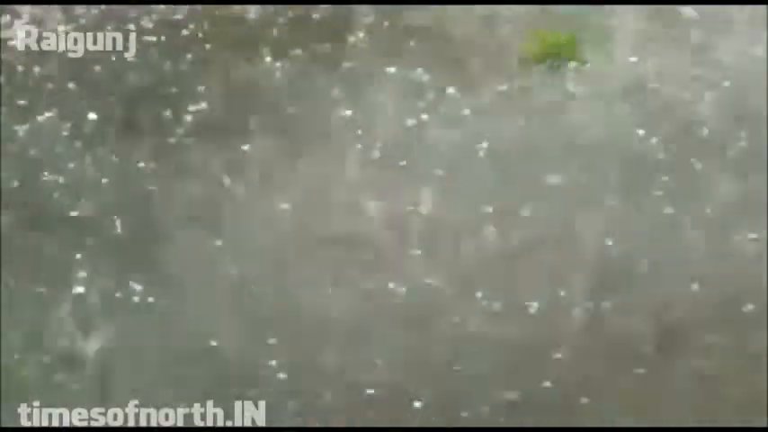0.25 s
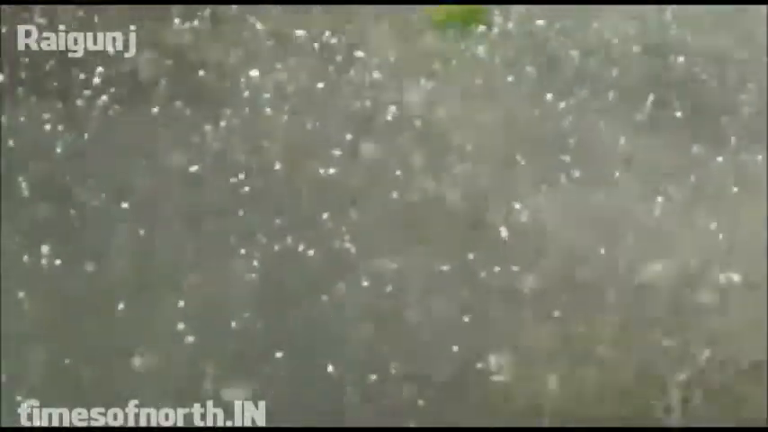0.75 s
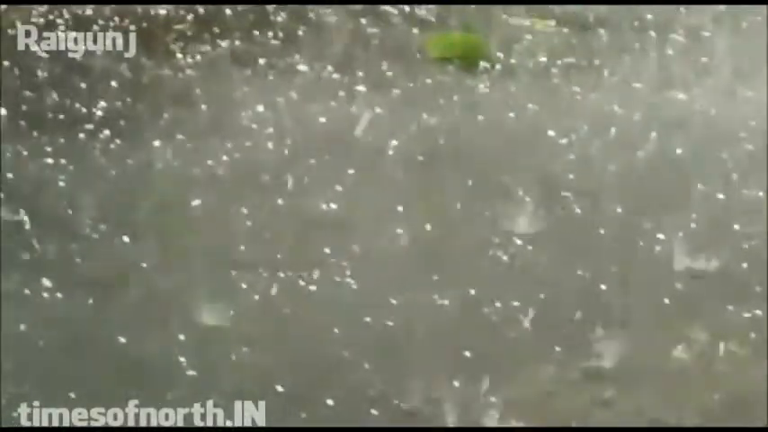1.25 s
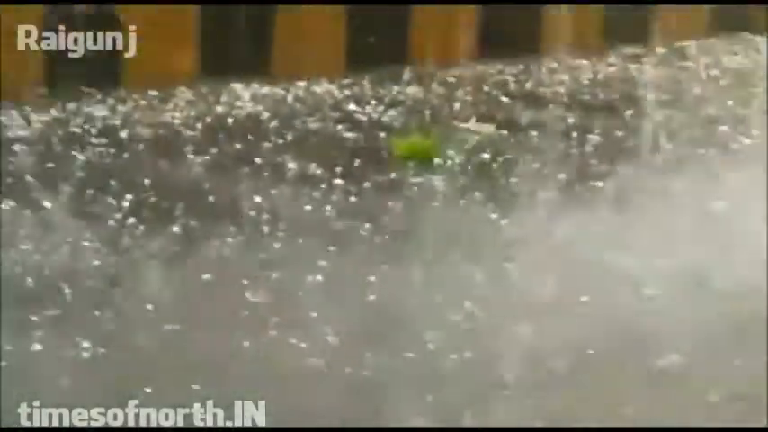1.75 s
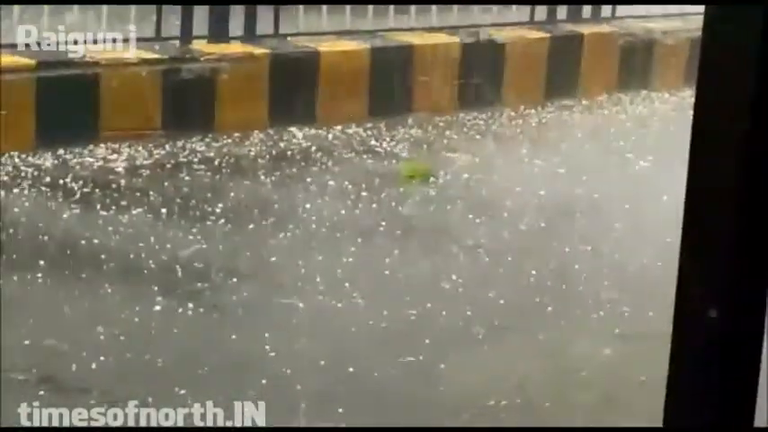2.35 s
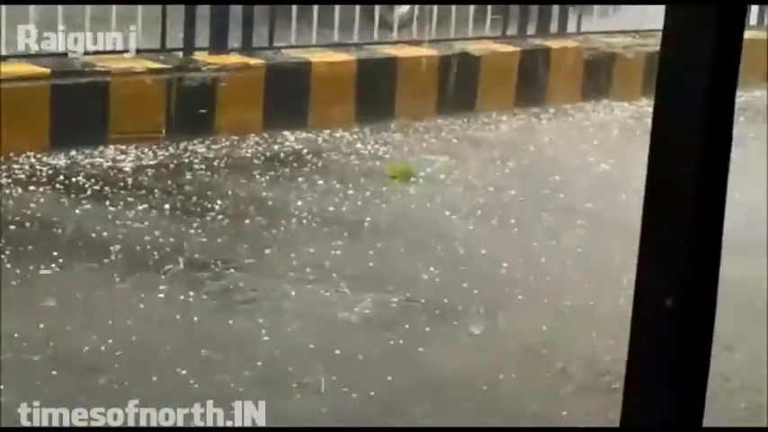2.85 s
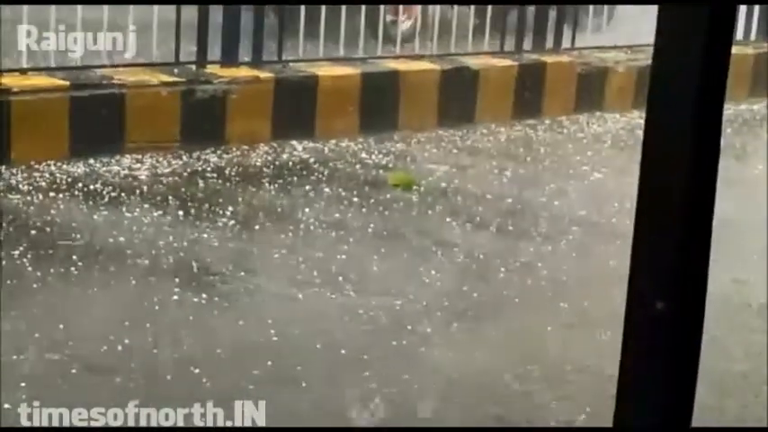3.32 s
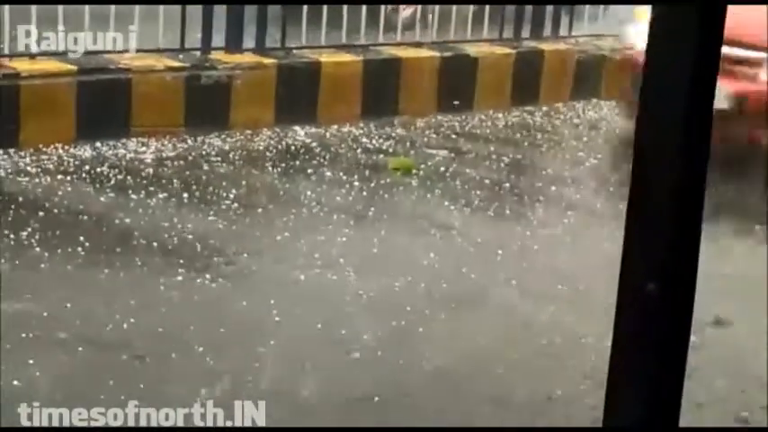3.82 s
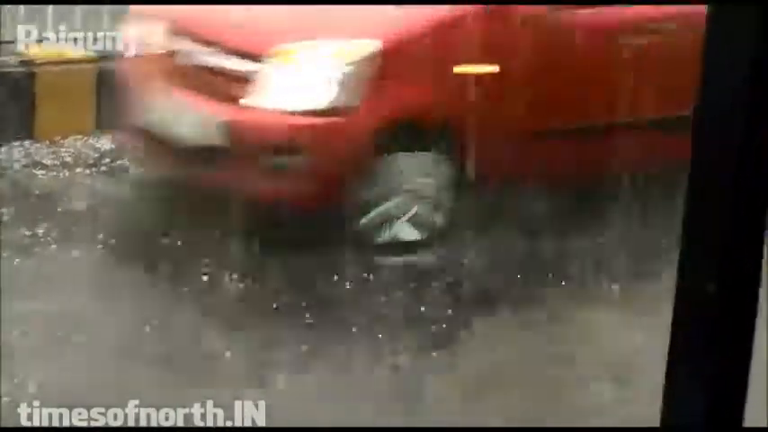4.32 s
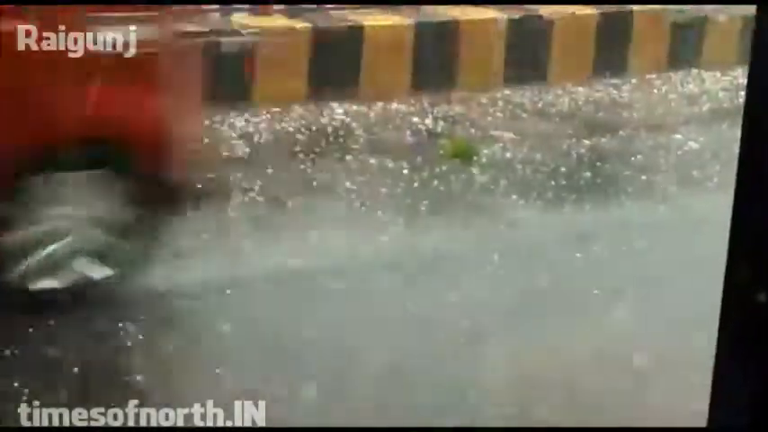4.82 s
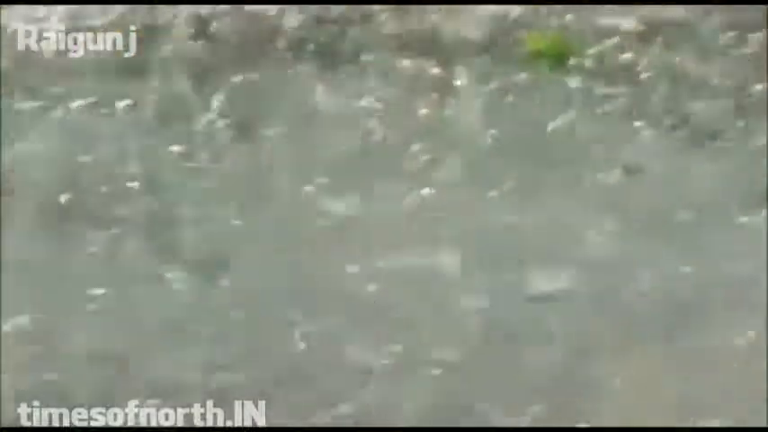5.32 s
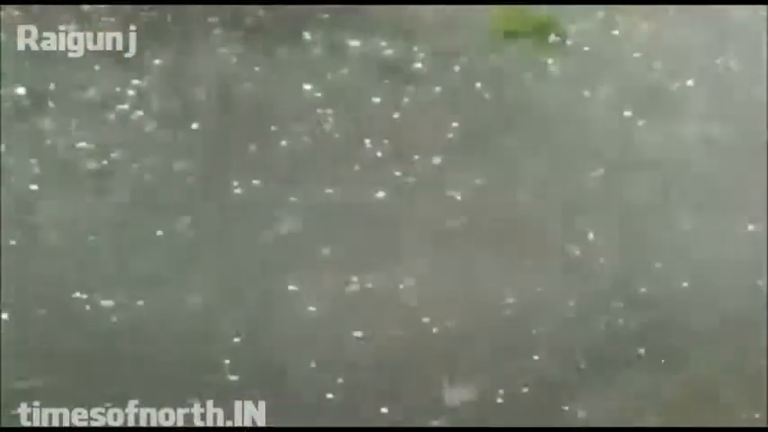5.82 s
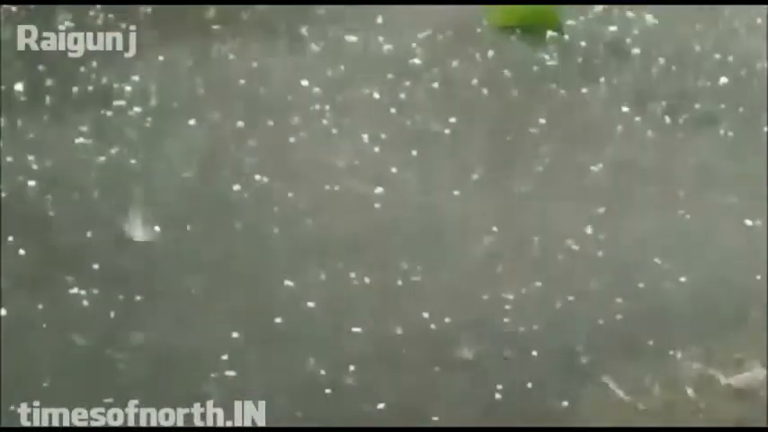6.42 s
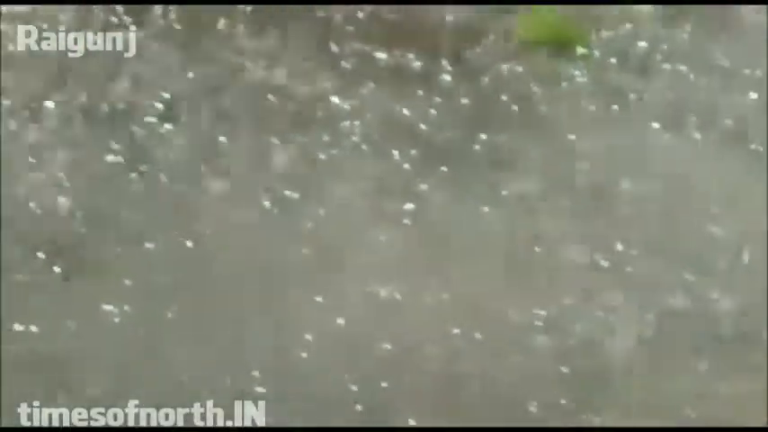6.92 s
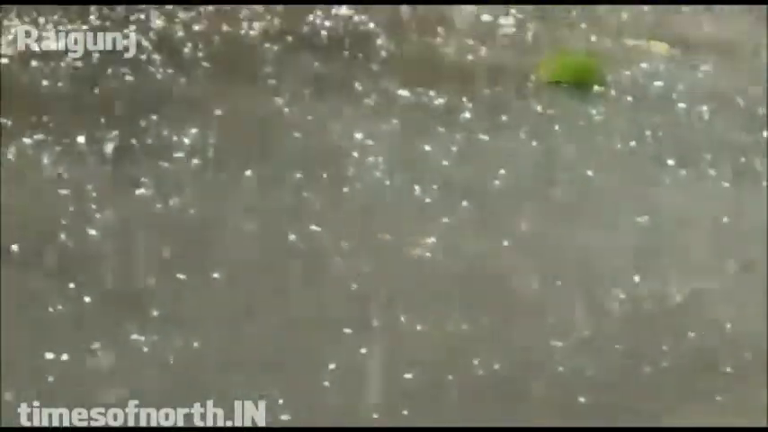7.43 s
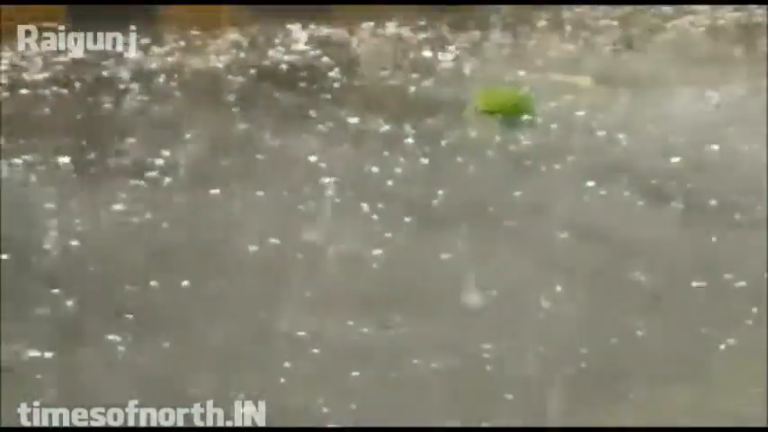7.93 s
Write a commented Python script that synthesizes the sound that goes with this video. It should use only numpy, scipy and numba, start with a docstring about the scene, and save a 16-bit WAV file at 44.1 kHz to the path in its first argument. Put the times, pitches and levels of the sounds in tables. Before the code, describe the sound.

Heard from inside an open-sided vehicle, heavy hail falls on a flooded road. A constant bright hiss and fine patter fill the background, with tiny plinks in water. Close by, big stones strike irregularly, about ten a second, each a short knock, crack and glassy splash. A car passing midway sounds a faint, shrill horn four times. The microphone's gain dips after loud hits.

```python
"""Hail on a flooded road

Heard from a vehicle with an open side. Large stones burst close by: filtered noise under decaying envelopes
makes a thud in the bodywork, a hollow knock, a crack and a treble shatter. Countless small stones patter and
hiss behind as bands of noise, and others plink into water as damped sines. A passing car sounds its horn four
times, as three Doppler-shifted partials; the phone's gain control ducks everything after each loud burst."""
import sys
import numpy as np
from scipy import signal
from scipy.io import wavfile
from scipy.ndimage import uniform_filter1d
from numba import njit

SR = 44100
rng = np.random.default_rng(int(sys.argv[2]) if len(sys.argv) > 2 else 0)


def file_out(sig):
    """Save sig as 16-bit WAV at sys.argv[1]."""
    # one column per channel
    cols = np.atleast_2d(sig).T
    # limit, then scale
    lim = np.clip(cols, -1, 1)
    pcm = np.round(lim * 32767).astype(np.int16)
    wavfile.write(sys.argv[1], SR, pcm)


N = 360278


def undb(db):
    """Logarithmic level: decibels to amplitude gain."""
    return 10 ** (np.asarray(db) / 20)


def unit(x):
    """Normalisation by effective value: scale to rms 1."""
    return x / np.sqrt(np.mean(x ** 2))


@njit
def svf(x, hz, q):
    """Resonance: a state-variable band-pass whose centre may move every sample."""
    y, band_state, low_state = np.empty(len(x)), 0., 0.
    for i in range(len(x)):
        g = np.tan(np.pi * hz[i] / SR)
        v = (band_state + g * (x[i] - low_state)) / (1 + g * (g + 1 / q))
        band_state = 2 * v - band_state
        low_state = low_state + 2 * g * v
        y[i] = v / q
    return y


@njit
def follow(x, attack, release):
    """Exponential averaging: the level follows x with separate rates for rising and falling."""
    y, level = np.empty(len(x)), x[0]
    for i in range(len(x)):
        rate = attack if x[i] > level else release
        level += (x[i] - level) * rate
        y[i] = level
    return y


def band(lo_hz, hi_hz, order=4):
    """Band-limited noise: white noise filtered between two edges, at rms 1."""
    sos = signal.butter(order, [lo_hz, hi_hz], "band", fs=SR, output="sos")
    return unit(signal.sosfilt(sos, rng.standard_normal(N)))


def walk(rate):
    """Slow random modulation: levels held 1 / rate s and slewed twice; spread near 1."""
    k = int(SR / rate)
    held = np.repeat(rng.standard_normal(N // k + 1), k)
    return 1.175 * uniform_filter1d(uniform_filter1d(held, k), k)[:N]


RISE_S = .0055
SNAP, SNAP_S = .12, .003  # height and decay of the snap


def burst(t60, rise):
    """Transient envelope of shattering ice: a snap, a shoulder while fragments fly, then a fall."""
    t = np.arange(int(1.2 * t60 * SR)) / SR
    fall = np.log(1000) * t / t60
    onset = 1 - np.exp(-(t / rise) ** 2)
    shoulder = (1 + 1.55 * fall) * np.exp(-1.4 * fall)
    snap = SNAP * np.exp(-np.abs(t - rise) / SNAP_S)
    return onset * (shoulder + snap)


PATTER_PER_S = 70  # in each group of small stones
PATTER_DB, PATTER_SPREAD_DB = -4, 4.5  # against the steady hiss: smallest stone, rise per unit of size


def patter(t60):
    """Random point process: power envelope of small stones; few are large, none huge."""
    chance = rng.random((int(PATTER_PER_S * N / SR), 2))
    size = np.minimum(-np.log(1 - chance[:, 1]), 3.5)  # exponential sizes
    hits = np.zeros(N)
    hits[(chance[:, 0] * N).astype(int)] = undb(PATTER_DB + PATTER_SPREAD_DB * size) ** 2
    return np.maximum(signal.oaconvolve(hits, burst(t60, RISE_S) ** 2)[:N], 0)


# Spectral density of the hiss; only its shape matters: frequency_hz [Hz], density_db [dB per Hz, relative]
HISS_SPECTRUM = [(18, -47), (30, -17), (93, -8), (287, -8.5), (554, -7), (649, -10), (866, -3), (1160, -3),
                 (3310, -4), (4650, -7), (8080, -8), (12600, 1.5), (14800, -1), (16000, -13)]
# Strength of the far downpour before the gain control: time_s [s], level_db [dB]
DOWNPOUR_LEVEL = [(0.0, -33), (0.86, -32), (1.0, -35), (3.3, -37), (4.2, -39), (5., -37), (7.8, -38),
                  (8.17, -37.5)]
TICK_T60_S, PATTER_T60_S = 0.078, 0.13  # decay of small stones in the treble and in the bass


def downpour():
    """Superposition in half-octave bands: small stones lift neighbours together, each band also flickers."""
    hz, density_db = np.transpose(HISS_SPECTRUM)
    centres = 16000 / 2 ** np.arange(.25, 9, .5)  # from treble down
    groups = [patter(t60) for t60 in np.geomspace(TICK_T60_S, PATTER_T60_S, num=9)]
    hiss = 0
    for k, centre in enumerate(centres):
        # each band blends the two nearest groups of stones
        place = 8 * k / len(centres)
        low = int(place)
        small = (low + 1 - place) * groups[low] + (place - low) * groups[low + 1]
        level_db = np.interp(np.log(centre), np.log(hz), density_db)
        level_db = level_db + 10 * np.log10(centre)  # bandwidth grows with frequency
        flicker_db = 2.2 * walk(12)
        noise = band(centre / 2 ** .25, centre * 2 ** .25)
        hiss = hiss + undb(level_db + flicker_db) * np.sqrt(1 + small) * noise
    time_s, strength_db = np.transpose(DOWNPOUR_LEVEL)
    return unit(hiss) * undb(np.interp(np.arange(N) / SR, time_s, strength_db))


PLINK_PER_S, PLINK_HZ = 120, (348.6, 5760)  # pitch range
PLINK_DB, PLINK_CYCLES = -47, 16.3  # level of the smallest, length of each ring in periods


def plinks():
    """Damped oscillation: stones falling into water give short rings of random pitch."""
    out = np.zeros(N)
    for when, pitch, size, phase in rng.random((int(PLINK_PER_S * N / SR), 4)):
        hz = PLINK_HZ[0] * (PLINK_HZ[1] / PLINK_HZ[0]) ** pitch
        turns = np.arange(int(PLINK_CYCLES * SR / hz)) * hz / SR
        envelope = np.exp(-5 * turns / PLINK_CYCLES) * (1 - np.exp(-turns))
        ring = np.sin(2 * np.pi * (turns + phase)) * envelope
        i = int(when * N)
        out[i:i + len(ring)] += undb(PLINK_DB + 16.0 * size ** 3) * ring[:N - i]
    return out


BOOM_HZ, THUD_HZ, BODY_HZ, CRACK_HZ = (48.7, 141), (236, 526), (500, 2200), (2000, 4800)  # band edges
LOW_TREBLE_HZ, MID_TREBLE_HZ, TOP_TREBLE_HZ = (5000, 7700), (7700, 12000), (12000, 15800)  # of the shatter
BOOM_DB, BODY_DB, KNOCK_Q = -9, -4, 3.83  # boom against thud, broad panel sound against knock
PANEL_HZ, PANEL_Q, PANEL_DB = 3220, 5.8, -7.5  # resonance in the crack, against its noise
RING_RISE_S, RING_LONGER = 0.0077, 1.197  # onset of thud and knock; factor on their decay
LOW_SHARE, LOW_PER_DB = .3, .028  # of what is below the top band; a duller shatter has more low treble
SCATTER_DB = 2.5  # unevenness of each voice
# Large stones; levels are envelope scales before sputter and gain control: time_s [s, envelope begins RISE_S
# earlier], pitch_hz [Hz, knock], thud_db, knock_db, crack_db, shatter_db [dB], top_db [dB, share of the
# shatter in its highest band, at most all of it], t60_s [s, decay; RING_LONGER times it for thud and knock]
LARGE_STONES = [(0.048, 980, -49, -32.5, -36.5, -36, -2, 0.21),
                (0.074, 930, -36.5, -26.5, -31, -31.5, -18, 0.18),
                (0.104, 530, -42, -31, -29.5, -26.5, -3, 0.17),
                (0.134, 780.0, -41, -31, -49, -57, -5, 0.22), (0.205, 1870, -44.5, -45, -49, -33, 0, 0.36),
                (0.301, 1600, -62, -28, -35.5, -26, -13, 0.17), (0.391, 880, -43, -31.5, -42, -39, 0, 0.17),
                (0.486, 660.0, -53, -38.5, -44, -31, -2, 0.21),
                (0.529, 2020.0, -46, -33, -34.5, -47, -17, 0.25),
                (0.556, 1570, -62, -30.5, -31, -25.5, -3, 0.18),
                (0.635, 1040, -56, -45, -38.5, -32.5, -8, 0.36),
                (0.711, 1830.0, -41, -35, -30, -22.5, -8, 0.09),
                (0.753, 1730, -37, -29.5, -40, -32, -3, 0.34),
                (0.823, 1150, -43, -23, -26.5, -25, -2.5, 0.16),
                (0.843, 1820.0, -39, -62, -30, -20, -5, 0.16), (0.93, 756, -41, -32, -32.5, -15, -1.5, 0.2),
                (0.994, 840, -38, -36.5, -40, -29, -17, 0.17), (1.201, 1350, -38, -35, -38, -32, -6, 0.2),
                (1.249, 810.0, -31.5, -28, -27, -20.5, -9.5, 0.2),
                (1.29, 1110.0, -38.5, -35, -33, -39, -18, 0.15),
                (1.486, 485, -45, -43, -38, -33.5, -20, 0.21),
                (1.631, 760.0, -42.5, -40, -43, -30.5, -9, 0.21),
                (1.662, 754, -62, -30, -32.5, -15.5, -2, 0.21),
                (1.746, 1810.0, -65, -32, -37, -36, -6, 0.17),
                (1.889, 1740.0, -45, -41, -42, -51, -9, 0.21),
                (1.958, 1140.0, -40, -31, -42, -32.5, -2.5, 0.2),
                (1.999, 1260, -51, -33, -33.5, -31.5, -3, 0.24),
                (2.038, 860.0, -51, -35, -37, -37, -6, 0.16),
                (2.423, 1800, -56, -32.5, -31.5, -30, -2.5, 0.21),
                (2.517, 750.0, -62, -41.5, -62, -44, 0, 0.37),
                (2.721, 880.0, -40.5, -30, -40, -29.5, -3, 0.44),
                (2.749, 916, -40, -23.5, -32.5, -32, -8, 0.24),
                (2.82, 960.0, -48, -39, -30.5, -13, -2, 0.17), (2.843, 1350.0, -62, -62, -62, -17, 2, 0.15),
                (3.243, 860, -43.5, -24.5, -31, -15, -2, 0.2),
                (3.271, 1420, -62, -43, -45, -19, -2.5, 0.15),
                (3.412, 746, -44, -30, -34.5, -20, -5.5, 0.2),
                (3.448, 830.0, -60, -36, -34.5, -20.5, -4.5, 0.17),
                (3.486, 2100.0, -47, -33, -36, -23, -6, 0.19), (3.56, 1350, -64, -31, -38, -43, -18, 0.097),
                (3.615, 1580.0, -57, -62, -54, -25, -1, 0.15),
                (3.657, 680.0, -47, -39, -34, -21.5, -3, 0.19),
                (3.791, 1960.0, -49, -37.5, -34.5, -26, -5, 0.23),
                (3.849, 500.0, -62, -48, -48, -29, 8, 0.09),
                (3.971, 730.0, -50, -39.5, -31.5, -35, -2.5, 0.16),
                (4.038, 1730, -64, -39, -35.5, -47, -3, 0.17),
                (4.114, 1580.0, -65, -42, -50, -40, -1.5, 0.3),
                (4.173, 1450.0, -35.5, -33.5, -32, -25, -4.5, 0.18),
                (4.222, 1450.0, -44, -32, -37.5, -38, -23, 0.19),
                (4.309, 750.0, -51, -35.5, -30.5, -21.5, -5.5, 0.23),
                (4.404, 1810, -43.5, -35.5, -32.5, -19, -2, 0.24),
                (4.482, 500.0, -44, -38, -36, -27, -16, 0.13),
                (4.509, 550.0, -50, -40.5, -33.5, -29.5, -27, 0.2),
                (4.586, 2010.0, -65, -48, -42, -37.5, -15, 0.34),
                (4.989, 1910, -44, -34, -30.5, -20, -5, 0.2),
                (5.032, 1800.0, -48, -39, -28.5, -26, -26, 0.2),
                (5.136, 1580, -62, -34, -40, -31, -1.5, 0.15),
                (5.347, 1920.0, -43, -33, -28.5, -19, -6, 0.18),
                (5.39, 2080, -52, -60, -39, -27, -12, 0.13), (5.474, 790.0, -62, -60, -44, -30, -21, 0.28),
                (5.562, 1310.0, -56, -57, -43, -32.5, -8, 0.12),
                (5.621, 1870.0, -62, -44.5, -44, -35, -2.5, 0.24),
                (5.648, 770.0, -62, -56, -39, -30, -14, 0.14),
                (5.694, 1014, -41, -30, -32, -19.5, -4, 0.15),
                (5.874, 1860.0, -62, -36, -43, -35.5, -8, 0.16),
                (5.941, 1520, -60, -29, -36.5, -29, -10, 0.22),
                (6.283, 796, -30, -31.5, -26, -18, -1, 0.25), (6.328, 870, -34.5, -26, -28, -23, -17, 0.2),
                (6.405, 860, -62, -62, -32.5, -38, -12, 0.15),
                (6.59, 1780, -62, -40.5, -37.5, -38, 0, 0.13),
                (6.746, 1120, -64, -40, -40, -31.5, -3.5, 0.16),
                (6.933, 1220, -62, -37.5, -38, -28.5, -3.5, 0.16),
                (6.976, 1850, -48, -39, -35, -38, -4, 0.25),
                (7.09, 1540.0, -48, -30.5, -28.5, -31.5, -7, 0.22),
                (7.152, 1020, -52, -43, -30, -16.5, -1, 0.17), (7.211, 890, -60, -37.5, -45, -38, -9, 0.35),
                (7.315, 1480, -56, -41.5, -41.5, -33.5, -3.5, 0.33),
                (7.465, 1100.0, -51, -37.5, -26.5, -30, -8, 0.32),
                (7.518, 907, -49, -30.5, -27.5, -16.5, -4, 0.21),
                (7.637, 970, -45, -30.5, -30, -16.5, -5, 0.21),
                (7.707, 1340, -57, -36, -35.5, -32, -5, 0.16),
                (7.789, 1590.0, -59, -35, -32.5, -33, -8, 0.24),
                (7.85, 1540.0, -44.5, -36, -35, -25, -1.5, 0.14),
                (7.887, 1520, -40.5, -31, -38, -47, -17, 0.17),
                (8.066, 1640, -37, -29.5, -27, -16, -2.5, 0.22)]


def stones():
    """Impact excitation: each large stone drives six voices of noise, in proportions of its own."""
    power, knock_hz = np.zeros((6, N)), np.full(N, 800.)
    for s, hz, *body_db, shatter_db, top_db, t60 in LARGE_STONES:
        i = int((s - RISE_S) * SR)
        top = min(undb(top_db) ** 2, 1)
        low = np.clip(LOW_SHARE - LOW_PER_DB * top_db, 0, 1)
        shares = np.array([(1 - top) * low, (1 - top) * (1 - low), top])
        blow = np.append(undb(body_db) ** 2, undb(shatter_db) ** 2 * shares)[:, None]
        # thud and knock ring on after the crack and shatter have died away
        for group, longer, rise in ((slice(0, 2), RING_LONGER, RING_RISE_S), (slice(2, 6), 1, RISE_S)):
            shape = burst(t60 * longer, rise)[:N - i]
            power[group, i:i + len(shape)] += blow[group] * shape ** 2
        knock_hz[i:] = hz
    # the bodywork is slow to start swinging
    power[0] = uniform_filter1d(power[0], size=800, origin=399)
    thud = band(*THUD_HZ, order=2) + undb(BOOM_DB) * band(*BOOM_HZ, order=2)
    # the spot that is hit rings at its own pitch over the broad sound of the panel
    once = svf(rng.standard_normal(N), knock_hz, KNOCK_Q)
    ring = svf(once, knock_hz, KNOCK_Q) / np.sqrt(knock_hz)
    knock = unit(ring) + undb(BODY_DB) * band(*BODY_HZ)
    # every crack is coloured by one broad panel resonance
    crack = band(*CRACK_HZ, order=8)
    crack = crack + undb(PANEL_DB) * unit(svf(crack, np.full(N, 1. * PANEL_HZ), PANEL_Q))
    shatter = [band(*hz, order=8) for hz in (LOW_TREBLE_HZ, MID_TREBLE_HZ, TOP_TREBLE_HZ)]
    voices = [unit(thud), unit(knock), unit(crack)] + shatter
    out = 0
    for voice, voice_power in zip(voices, power):
        # fragments land unevenly, so each burst sputters
        sputter = undb(SCATTER_DB * walk(150))
        out = out + voice * np.sqrt(np.maximum(voice_power, 0)) * sputter
    return out


# Horn blasts: start_s [s], length_s [s]
HORN_BLASTS = [(2.37, .25), (3.16, .42), (3.62, .65), (4.398, .72)]
# Partials of the horn: order [multiple of the fundamental], level_db [dB, relative, before flutter]
HORN_PARTIALS = [(1, -11), (8, 0), (9, -10)]
HORN_HZ, HORN_EDGE_S = 420.5, .03  # fundamental at rest, fade at either end of a blast
HORN_DB = -46  # rms of a 0 dB partial at the nearest point
CAR_M_S, CAR_PASSES_S, CAR_M = 2.5, 4.3, 1.7  # speed, nearest moment, nearest distance


def horn():
    """Doppler effect and inverse distance on a buzzing diaphragm whose tone disc favours partials 8 and 9."""
    t = np.arange(N) / SR
    along = CAR_M_S * (t - CAR_PASSES_S)
    distance = np.hypot(along, CAR_M)
    hz = HORN_HZ * (1 - CAR_M_S / 343 * along / distance)  # 343 m/s: speed of sound
    phase = 2 * np.pi * np.cumsum(hz * (1 + .006 * walk(60))) / SR  # pitch wavers slightly
    tone = sum(undb(db + 4 * walk(30)) * np.sin(order * phase) for order, db in HORN_PARTIALS)
    pressed = 0
    for s, length in HORN_BLASTS:
        pressed = pressed + np.clip(np.minimum(t - s, s + length - t) / HORN_EDGE_S, 0, 1)
    return np.sqrt(2) * undb(HORN_DB) * tone * pressed * CAR_M / distance


def scene():
    """Linear superposition: all sources add at one microphone."""
    return (stones() + downpour() + plinks() + horn())[None]


KNEE_DB, RATIO, ATTACK_S, RELEASE_S = -36.5, 1.309, 0.046, 0.3  # gain control
BASS_CUT_HZ, DULL_HZ, TOP_HZ = 48, 15700, 15600  # gentle band edges, then a steep low-pass
CEILING = .4  # amplitude that rounded peaks approach


def record(dry):
    """Dynamic compression with slow recovery, then saturation of peaks; deep bass and the top are cut."""
    level = follow(np.abs(dry[0]), 1 / (ATTACK_S * SR), 1 / (RELEASE_S * SR))
    gain = np.minimum(undb(KNEE_DB) / (level + 1e-9), 1) ** (1 - 1 / RATIO)
    gentle = signal.butter(2, [BASS_CUT_HZ, DULL_HZ], "band", fs=SR, output="sos")
    steep = signal.ellip(10, .2, 80, TOP_HZ, fs=SR, output="sos")
    rounded = CEILING * np.tanh(signal.sosfilt(gentle, dry) * gain / CEILING)
    return signal.sosfilt(steep, rounded)


dry = scene()
out = record(dry)
file_out(out)
```